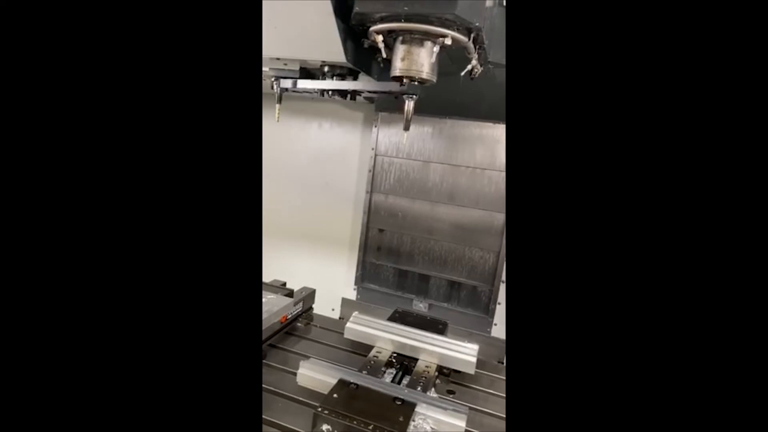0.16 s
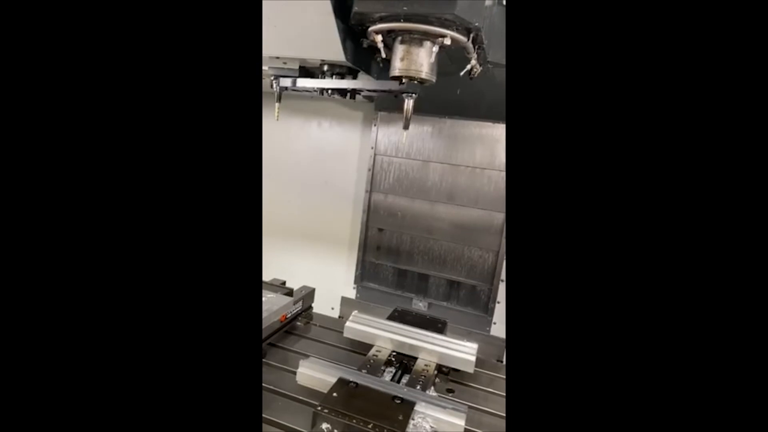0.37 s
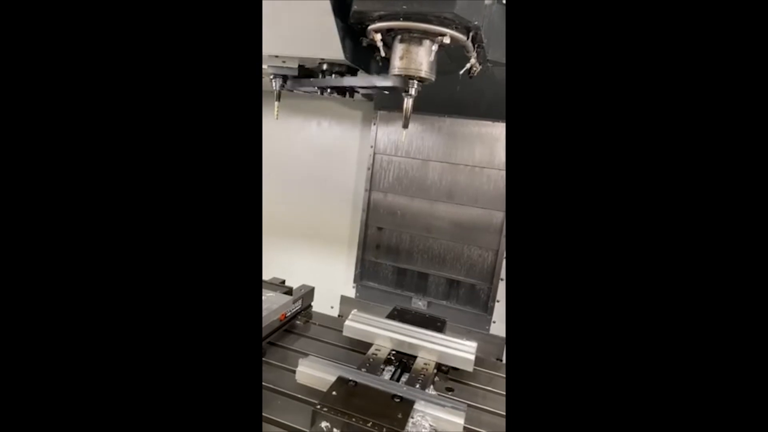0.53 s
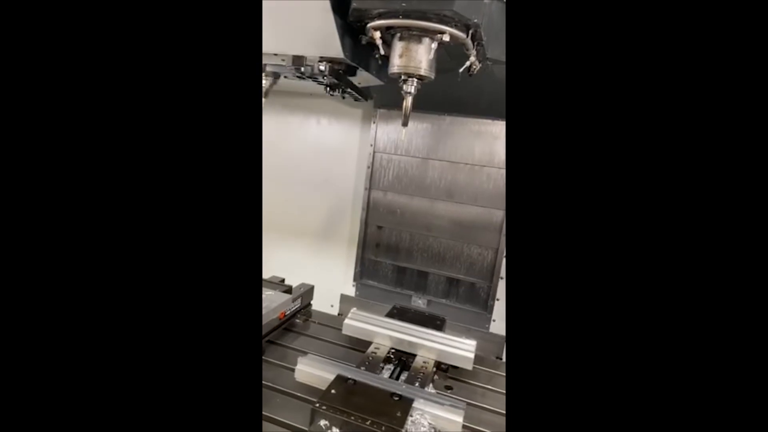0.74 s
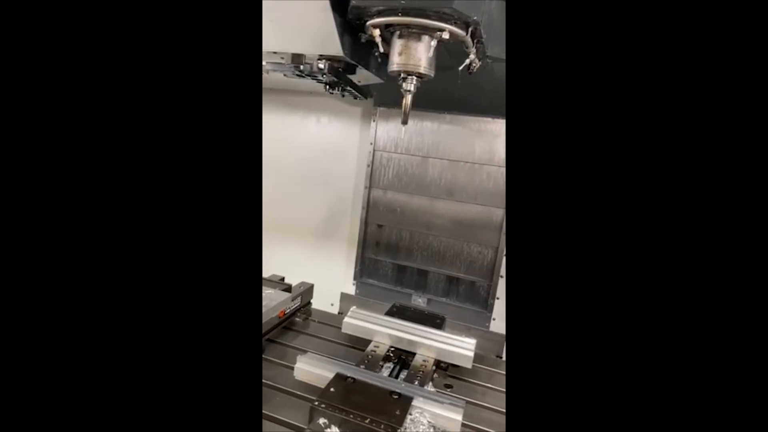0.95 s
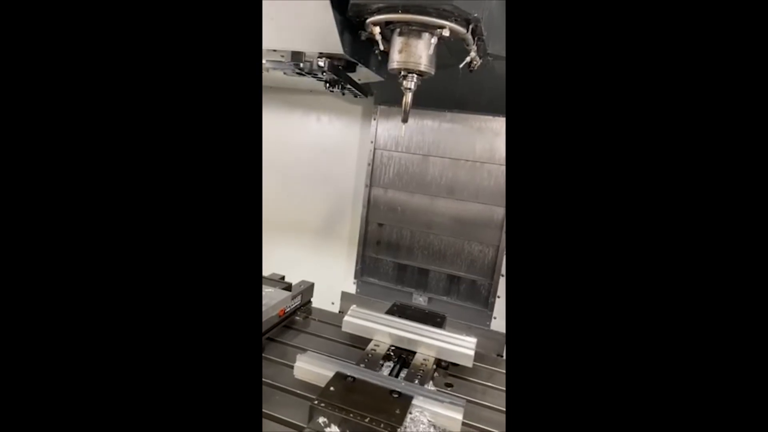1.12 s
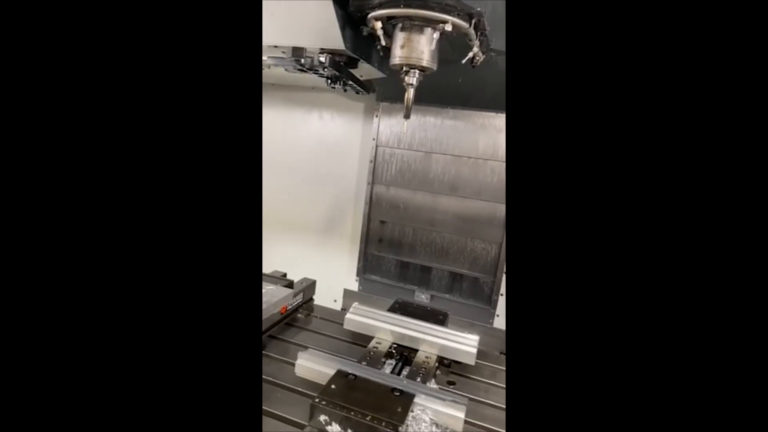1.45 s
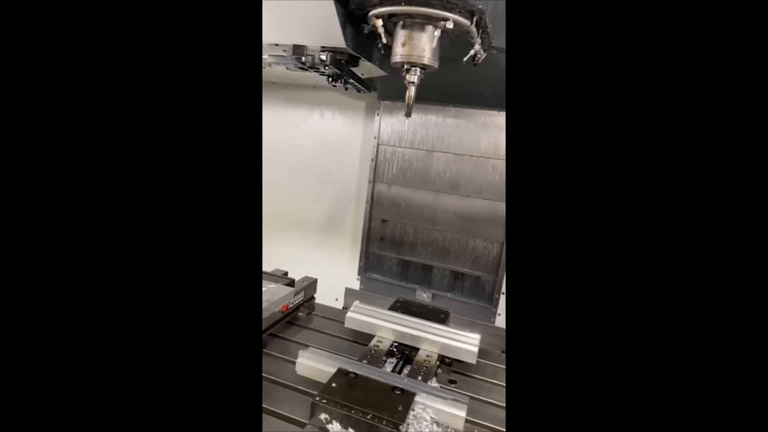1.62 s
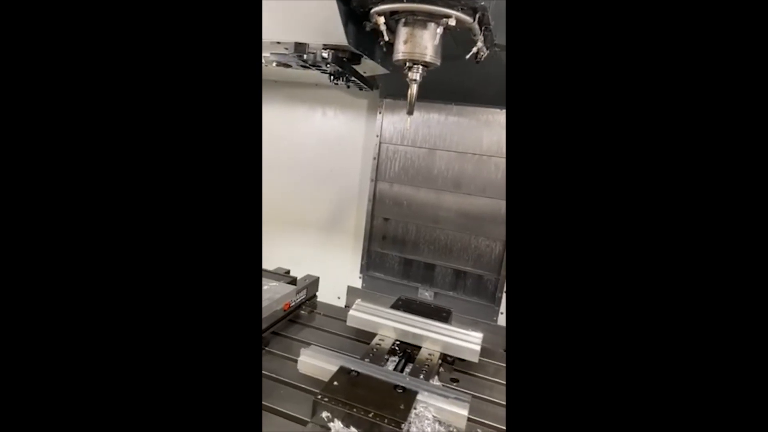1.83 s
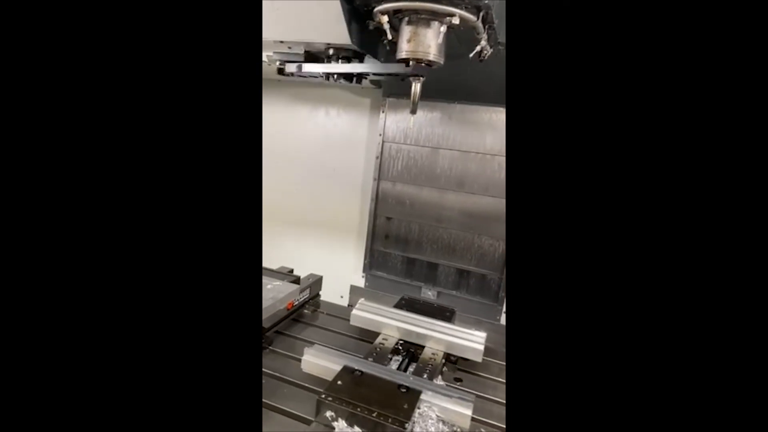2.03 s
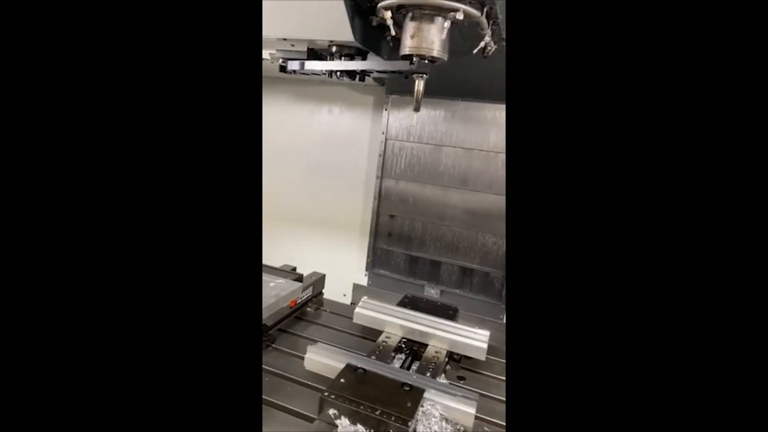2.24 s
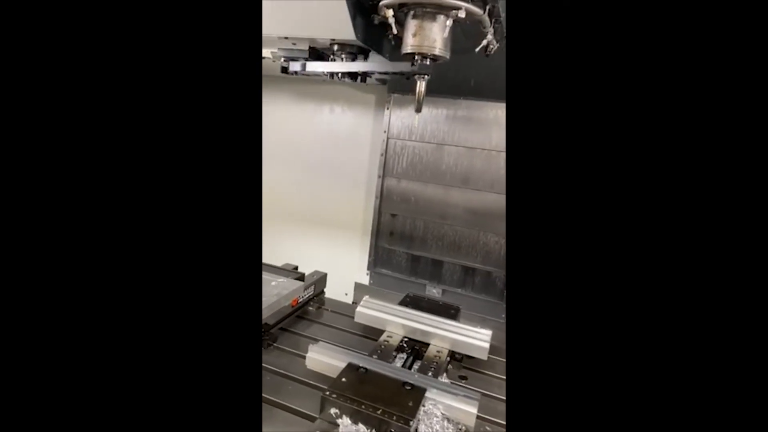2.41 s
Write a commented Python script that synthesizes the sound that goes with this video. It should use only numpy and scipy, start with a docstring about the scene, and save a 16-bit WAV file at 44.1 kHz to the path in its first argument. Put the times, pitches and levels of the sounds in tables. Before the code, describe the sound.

Inside a machining centre's metal cabin, a tool changer clacks as its gears slow. Puffs of air and a thudding magazine follow, then a hard clack, light ticks and a rising gear whine, all in wide stereo over steady hum.

```python
"""A machine's tool-changing arm, heard inside its sheet-metal cabin: its gears whine down as it parks,
and whine up again near the end. In between, air cylinders hiss and tip the tool pocket until it clacks
on its stop, and the magazine (the tool store) drones and thuds round one place. Struck steel rings,
loose parts tick, and pumps and fans hum throughout."""
import sys
import numpy as np
from scipy import signal
from scipy.fft import rfft, irfft, next_fast_len
from scipy.io import wavfile

SR = 44100
rng = np.random.default_rng(int(sys.argv[2]) if len(sys.argv) > 2 else 0)


def dump_mix(stems):
    """Bounce the given channels to the path in sys.argv[1] as a 16-bit WAV at rate SR."""
    frames = np.atleast_2d(stems).T  # one column per channel
    limited = np.clip(frames, -1, 1)  # hard clip at full scale
    pcm = np.round(limited * 32767).astype(np.int16)
    wavfile.write(sys.argv[1], SR, pcm)


N = 113337

# A fade time (t60) is how long a sound takes to drop 60 dB. A tilt above zero makes it brighter.
# the arm slowing down, then speeding up (time [s], whine pitch [Hz], level [dB])
ARM_SLOWING = [(0, 1010, -27.5), (.03, 994, -35.5), (.07, 897, -37), (.12, 786, -46.5), (.18, 603, -62.5)]
ARM_SPEEDING = [(2.36, 600, -53), (2.411, 749.5, -35), (2.452, 900, -24), (2.469, 954, -25.5),
                (2.486, 1004, -17), (2.507, 1012, -17), (2.518, 1041, -22.5), (2.57, 1045, -20.5)]
# tones in the gear whine (pitch multiple, level [dB])
WHINE_TONES = [(1, -0.5), (2.12, -21), (2.61, -14)]
# noise of the rolling cam and bearings (frequency [Hz], level [dB])
ROLLING_COLOUR = [(30, -17), (50, 9.5), (110, 1), (300, -7), (650, -5), (1100, 0.5), (1650, -6.5),
                  (2500, -4.5), (3600, -10), (4500, -10), (6500, -25.5), (9200, -12), (15000, -33)]
# tones at which the drive's housing rings (pitch [Hz], width [Hz], level [dB])
HOUSING_TONES = [(885, 50, -2.5), (1085, 90, -1.5), (1394, 70, -8.5), (1666, 45, -9.5), (2157, 50, -3.5),
                 (2623, 70, 0.5), (3190, 90, -8.5), (3510, 85, -13), (4270, 130, -10.5), (4820, 150, -10.5),
                 (5300, 150, -10)]
# metal clacks, and at 2.423 s a sharp puff of air (time [s], level [dB], tilt [dB/octave], peak [Hz], peak
# boost [dB], fade time [s])
CLACK_HITS = [(.016, -23, -1.5, 4300, 9, 0.37), (.058, -29, -2, 3300, 8, .2),
              (0.1956, -23.5, -4, 2930, 17.5, 0.22), (0.5134, -17, 2, 4700, 8, 0.27),
              (.528, -23, -1, 3460, 6.5, 0.32), (.695, -25, -2.5, 5720, 17.5, 0.23),
              (.978, -30, -2.5, 1400, 10, .45), (1.008, -28, -4, 1900, 10, 0.26),
              (1.224, -27, -8.5, 760, 19, 0.32), (1.9781, -12, 2.4, 9300, 7, .25),
              (2.068, -31, -4, 1900, 6, .3), (2.088, -26.5, -3, 2520, 2, 0.35),
              (2.423, -19, 5, 9100, 11, 0.16)]
# noise of a clack (frequency [Hz], level [dB])
CLACK_COLOUR = [(100, -23), (380, 1.5), (700, 4), (1300, 3), (2100, 1), (3500, -0.5), (6500, -2),
                (8000, -6.5), (11000, -3.5), (15500, -16)]
# tones of ringing steel (pitch [Hz], level [dB], fade time [s])
STEEL_TONES = [(345, -8.5, 0.26), (990, -11, 0.24), (1464, -14, 0.29), (2094, -3, .22), (2960, -14, .31),
               (3359, -3, 0.14), (3870, -10, 0.23), (4467, -1, .31), (4576, -3, .36), (4700, -4, .29),
               (4888, -8, .27), (7830, 9, 0.094)]
# blows that make the steel ring (time [s], level [dB], pitch multiple)
STEEL_HITS = [(.016, -29, .948), (.056, -31, .948), (.514, -19, 1.0)]
# frame thuds (time [s], rattle [dB], rattle tilt [dB/octave], boom [Hz], boom [dB], rattle fade time [s])
THUD_HITS = [(0, -26, 1, 50, -25, 0.37), (.07, -28, 1, 49.7, -21, .38), (.2, -24.5, 1.5, 80, -34, 0.46),
             (.548, -26.5, 2.5, 450, -23.5, 0.25), (.7, -32, 10, 50.3, -22.5, .5),
             (1.0, -27, 3, 50, -23.5, .45), (1.228, -21, -2, 105, -28, 0.51),
             (1.29, -29, -3, 319.5, -35.5, 0.4), (1.49, -31, 2, 70, -37, .4),
             (1.82, -27.5, 3, 70, -45.5, 0.55), (1.976, -18.5, 4, 336.8, -22, 0.45),
             (2.085, -19.5, 1.5, 82.1, -18.5, .6), (2.125, -25.5, -1, 52.5, -23, .5)]
# rattle of the sheet-metal panels (frequency [Hz], level [dB])
PANEL_COLOUR = [(35, -23), (70, -9), (150, 3), (330, -1.5), (560, -8), (800, -3.5), (1300, -19.5),
                (3000, -21.5), (8000, -54)]
# drone of the turning magazine (pitch [Hz], level [dB])
MAGAZINE_TONES = [(126, 0), (165, -9), (252, -11)]
# how hard the magazine works as it turns (time [s], level [dB])
MAGAZINE_LOAD = [(.995, -55), (1.025, -23), (1.08, -26), (1.11, -32), (1.21, -35), (1.24, -24), (1.31, -27),
                 (1.365, -25), (1.42, -42)]
# puffs of air (time [s], length [s], level [dB], level change [dB/s], fade time [s])
AIR_PUFFS = [(0, 0.23, -27, -23, 0.43), (0.662, 0.29, -33, -1.5, 0.4), (1.476, 0.36, -27.5, 1.5, 0.54),
             (2.106, 0.35, -41, 7, .4)]
# hiss of escaping air (frequency [Hz], level [dB])
AIR_COLOUR = [(500, -17), (1500, -1.5), (2600, 0.5), (4200, -1), (6500, 0.5), (8000, 0.5), (9500, -16.5),
              (12000, -1), (14500, -8.5), (16000, -12.5)]
# light ticks (time [s], level [dB], pitch [Hz], fade time [s])
TICK_HITS = [(1.022, -34.5, 3040, .45), (2.213, -39, 2650, .12), (2.263, -34, 2700, .16),
             (2.329, -35.5, 2676, 0.18)]
# tones in a tick (pitch multiple, level [dB])
TICK_TONES = [(1, -0.5), (1.025, -8), (1.18, -6.5)]
# hum of pumps and mains power (pitch [Hz], level [dB])
HUM_TONES = [(48, -45), (70, -41), (123.8, -45.5), (252, -44), (500.6, -41), (1696, -48.5), (2078, -52.5),
             (2929, -56)]
# noise of fans and workshop (frequency [Hz], level [dB])
FAN_COLOUR = [(22, -29), (45, 1), (70, 2.5), (130, -0.5), (200, -7), (400, -7), (620, -11.5), (1200, -15),
              (1750, -14.5), (3000, -24), (4500, -23), (8000, -33.5), (13000, -36.5), (16000, -43)]
# stereo width (frequency [Hz], side level over middle [dB])
STEREO_WIDTH = [(30, -40), (125, -27), (250, -13.5), (450, -2.5), (700, 6.5), (1100, 2), (4000, 0.5),
                (4900, 2.5), (5600, -0.5), (7000, 5), (8300, 28), (10200, 51), (12500, 6.5), (14500, 1),
                (15500, -17)]
# stereo balance (frequency [Hz], left level over right [dB])
STEREO_BALANCE = [(50, 0.6), (125, -2.5), (300, -4.5), (600, -4.5), (1000, -5.5), (1800, 1.5), (4000, -1.5)]

HIT_SIZE = 32768  # samples in one hit or echo


def arm(t, swing, rolling_db, housing_db, housing_tilt_db):
    """The gears whine higher as the arm speeds up; cam and bearings roll and make the housing ring."""
    roughness, flutter_hz, pan_db = .9, 130, -5  # the whine sits to the right
    times, pitches, levels = np.array(swing).T
    gain = undb(np.interp(t, times, levels, left=-120)) * fade(t - times[-1], t60=.2)
    cycles = np.cumsum(np.interp(t, times, pitches)) / SR
    whine = sum(undb(db) * tone(k * cycles, flutter(roughness * k, flutter_hz * k))
                for k, db in WHINE_TONES)
    whine = cabin_echo(gain * whine) * undb(np.array([[pan_db], [-pan_db]]) / 2)
    lowest_hz = HOUSING_TONES[0][0]
    housing = sum(undb(db + housing_tilt_db * np.log2(hz / lowest_hz)) * tone(hz * t, waver(width))
                  for hz, width, db in HOUSING_TONES)
    shaking = gain.max() * (gain / gain.max()) ** .7  # rises and falls less than the whine
    rolling = undb(rolling_db) * long_noise(ROLLING_COLOUR)
    return whine + shaking * (rolling + undb(housing_db) * housing)


def clacks(t):
    """Steel hits a stop: a sharp crack, one bounce, then a bright tail from the cabin. A short, sharp puff of
    air takes the same shape."""
    crack_s, bounce_s = .0024, .004
    crack = undb(5.5) * np.exp(-t / crack_s)
    bounce = undb(-2) * (t > bounce_s) * np.exp(-np.abs(t - bounce_s) / crack_s)
    out = np.zeros((2, N))
    for start, db, tilt_db, peak_hz, boost_db, t60 in CLACK_HITS:
        gain = undb(db) * np.hypot(crack + bounce, fade(t, t60))
        add(out, start, gain * noise(CLACK_COLOUR, HIT_SIZE, tilt_db, peak_hz, boost_db))
    return out


def steel_rings(t):
    """The tool holder and gripper ring after a blow; their loose contact makes the tones flutter."""
    out = np.zeros((2, N))
    for start, hit_db, k in STEEL_HITS:
        for hz, db, t60 in STEEL_TONES:
            chatter = flutter(depth=.85, rate_hz=89.5)[:, :HIT_SIZE]
            ring = tone(k * hz * t + rng.random(), chatter)
            add(out, start, undb(hit_db + db) * fade(t, t60) * ring)
    return out


def thuds(t):
    """Heavy parts start or stop: the frame booms and the panels rattle a little longer."""
    rise = np.minimum(t / .012, 1)  # a soft, 12 ms start
    out = np.zeros((2, N))
    for start, rattle_db, tilt_db, boom_hz, boom_db, t60 in THUD_HITS:
        rattle = undb(rattle_db) * fade(t, t60) * noise(PANEL_COLOUR, HIT_SIZE, tilt_db)
        boom = undb(boom_db) * fade(t, .78 * t60) * tone(boom_hz * t)
        add(out, start, rise * (rattle + boom))
    return out


def magazine(t):
    """The turning magazine drones roughly through the frame, loudest as it starts and brakes."""
    times, levels = np.array(MAGAZINE_LOAD).T
    load = undb(np.interp(t, times, levels, left=-120, right=-120))
    drone = sum(undb(db) * tone(hz * t, flutter(depth=.5, rate_hz=30)) for hz, db in MAGAZINE_TONES)
    return load * drone


def air_hiss(t):
    """A valve lets air out: the hiss sinks or swells with the pressure, then dies away."""
    power = 0
    for start, length, db, db_per_s, t60 in AIR_PUFFS:
        age = t - start
        opening = np.clip(age / .025, 0, 1)  # opens in 25 ms
        flow = opening * undb(db + db_per_s * np.clip(age, 0, length)) * fade(age - length, t60)
        power += flow ** 2
    return np.sqrt(power) * long_noise(AIR_COLOUR)


def ticks(t):
    """Small loose parts tap and ring briefly."""
    out = np.zeros((2, N))
    for start, hit_db, hz, t60 in TICK_HITS:
        ring = sum(undb(db) * tone(k * hz * t + rng.random()) for k, db in TICK_TONES)
        add(out, start, undb(hit_db) * fade(t, t60) * ring)
    return out


def pumps_and_fans(t):
    """Pumps and mains power give a wavering hum over the steady rush of fans."""
    hum = sum(undb(db) * tone(hz * t, 1 + .33 * waver(rate_hz=7.94)) for hz, db in HUM_TONES)
    return hum + undb(-30.5) * long_noise(FAN_COLOUR)


def cabin_echo(sound):
    """Many quick echoes off the walls join the sound, so a sliding tone blurs and swells unevenly."""
    echoes = rng.standard_normal((2, HIT_SIZE)) * fade(np.arange(HIT_SIZE) / SR, t60=.25)
    echoes /= np.sqrt(np.sum(echoes ** 2, axis=1, keepdims=True))
    echoed = signal.fftconvolve(sound, echoes, axes=1)[:, :N]
    echo_gain = undb(-5)
    return (sound + echo_gain * echoed) / np.hypot(1, echo_gain)


def undb(db):
    """Turn decibels into a number to multiply by."""
    return 10 ** (np.asarray(db) / 20)


def curve(points, hz):
    """Read a level between the points of a (frequency [Hz], level [dB]) table."""
    frequencies, levels = np.array(points).T
    return np.interp(np.log(hz + 1), np.log(frequencies), levels)


def noise(colour, size, tilt_db=0, peak_hz=1000, boost_db=0, peak_octaves=.21):
    """Stereo noise with a colour (its mix of low and high), a tilt and one boosted peak."""
    hz = np.fft.rfftfreq(size, 1 / SR)
    octaves = np.log2((hz + 20) / peak_hz)
    peak_db = boost_db / (1 + (octaves / peak_octaves) ** 2)
    gain = undb(curve(colour, hz) + tilt_db * octaves + peak_db)
    gain /= np.sqrt(np.mean(gain ** 2))
    return irfft(rfft(rng.standard_normal((2, size))) * gain, size)


def long_noise(colour):
    """Coloured noise that lasts the whole scene."""
    return noise(colour, next_fast_len(N, True))[:, :N]


def waver(rate_hz):
    """Random drift in a tone's strength and phase (its place in the cycle), for left and right."""
    points = rng.standard_normal((2, 1024)) + 1j * rng.standard_normal((2, 1024))
    position = np.arange(N) / SR * rate_hz
    return np.array([np.interp(position, np.arange(len(p)), p) for p in points]) * np.sqrt(3) / 2


def flutter(depth, rate_hz):
    """Drift that roughens a tone but keeps its average power."""
    return (1 + depth * waver(rate_hz)) / np.hypot(1, depth)


def tone(cycles, drift=1):
    """A sine wave, a quarter cycle apart in left and right before any drift."""
    return np.sqrt(2) * np.imag(np.exp(2j * np.pi * cycles) * np.array([[1], [1j]]) * drift)


def fade(t, t60):
    """Stay at 1 until t = 0, then drop 60 dB every t60 seconds."""
    return np.exp(-np.log(1000) * np.maximum(t, 0) / t60)


def add(out, start, sound):
    """Mix one hit in at its start time."""
    i = int(start * SR)
    out[:, i:i + HIT_SIZE] += sound[:, :max(N - i, 0)]


def scene():
    """Add up all the sounds in the cabin."""
    t = np.arange(N) / SR
    hit_t = t[:HIT_SIZE]  # time since a hit began
    slowing = arm(t, ARM_SLOWING, rolling_db=9, housing_db=-6.5, housing_tilt_db=3)
    speeding = arm(t, ARM_SPEEDING, rolling_db=-3, housing_db=-12, housing_tilt_db=-.5)
    hits = clacks(hit_t) + steel_rings(hit_t) + thuds(hit_t) + ticks(hit_t)
    return slowing + speeding + hits + magazine(t) + air_hiss(t) + pumps_and_fans(t)


def record(dry):
    """Shape the stereo: centred bass, very wide, out-of-phase high treble, low mids leaning right."""
    size = next_fast_len(N + 4096, True)
    hz = np.fft.rfftfreq(size, 1 / SR)
    left, right = rfft(dry, size)
    width = undb(curve(STEREO_WIDTH, hz))
    lean = undb(curve(STEREO_BALANCE, hz) / 2)
    mid, side = np.array([left + right, (left - right) * width]) / np.sqrt(2 * (1 + width ** 2))
    stereo = irfft(np.array([(mid + side) * lean, (mid - side) / lean]), size)[:, :N]
    treble_cut = signal.ellip(10, .2, 80, 15900, fs=SR, output="sos")  # steep, above 15900 Hz
    return signal.sosfilt(treble_cut, np.clip(stereo, -1, 1))


dry = scene()
out = record(dry)
dump_mix(out)
```